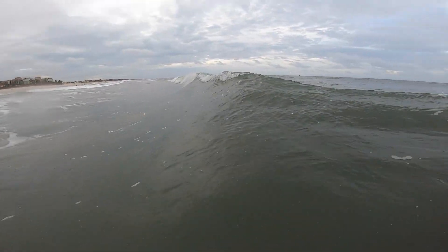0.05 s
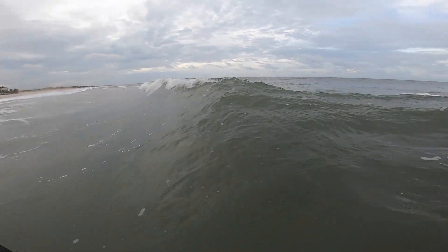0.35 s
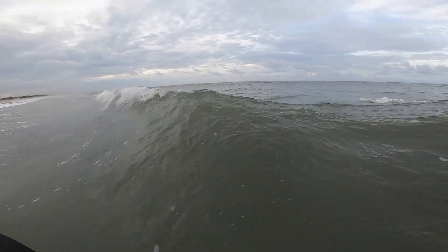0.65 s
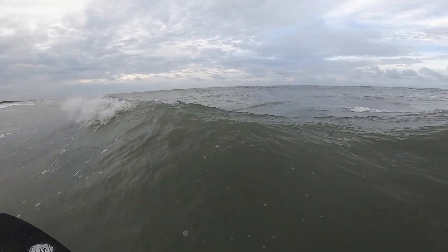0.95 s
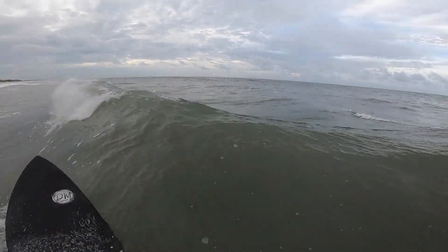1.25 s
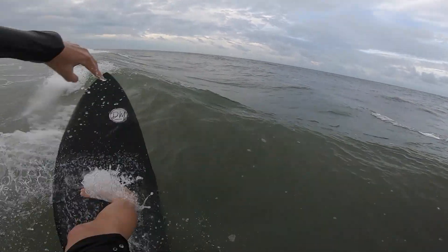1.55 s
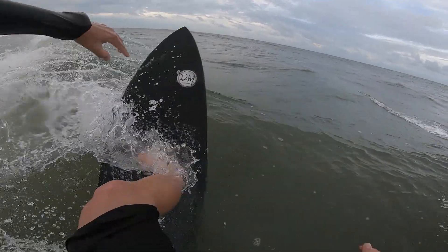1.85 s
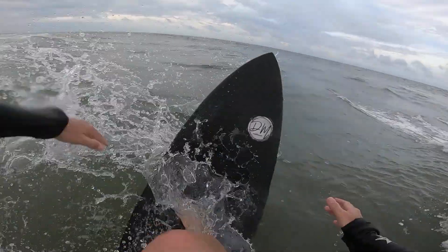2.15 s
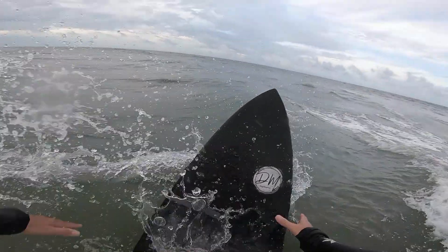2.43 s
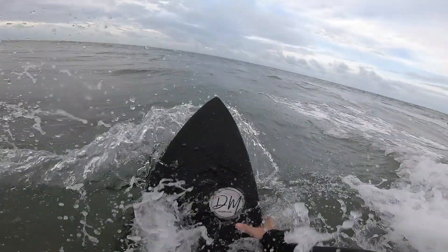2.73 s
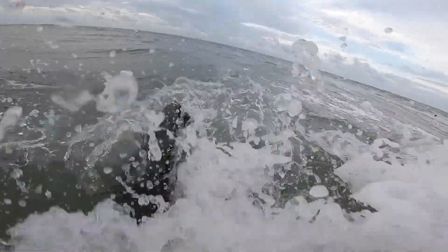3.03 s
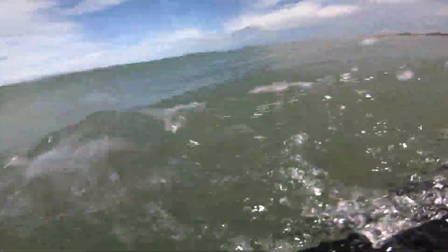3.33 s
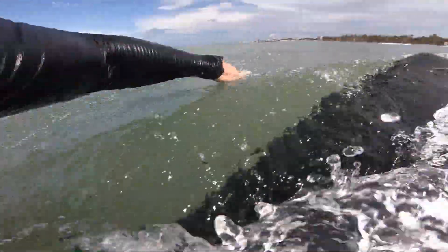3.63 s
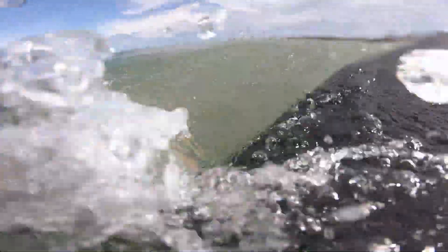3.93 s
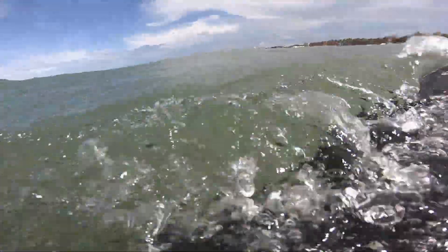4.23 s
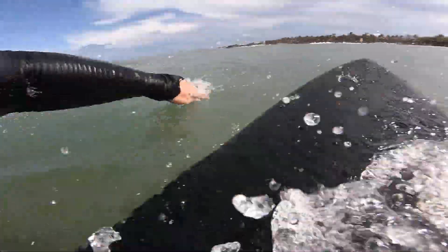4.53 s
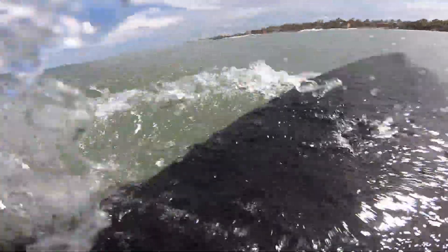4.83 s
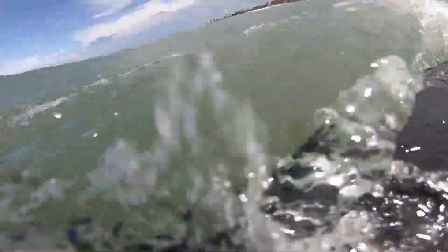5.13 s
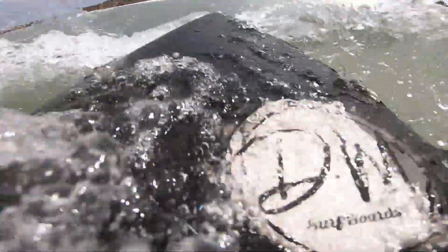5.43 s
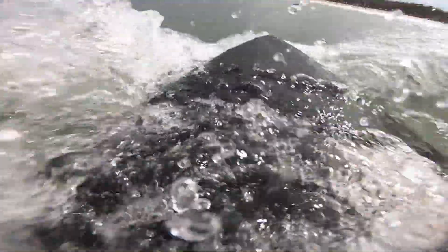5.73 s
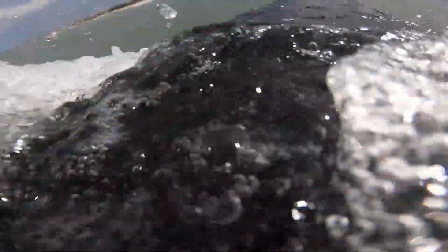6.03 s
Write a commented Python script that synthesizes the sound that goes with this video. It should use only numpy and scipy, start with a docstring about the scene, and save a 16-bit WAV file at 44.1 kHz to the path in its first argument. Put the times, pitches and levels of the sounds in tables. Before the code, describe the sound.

Surf buffets a microphone on a surfboard ride, first muffled in slow motion, then, after a short gap, with quick slaps, foam and drips.

```python
"""A surfer carries a camera through breaking waves. First, in slow motion and over an octave down,
whitewater rushes and bubbles, water surges against the board, and wind and spray buffet the wet
microphone port, a damped resonator that answers each slap with a short ring and a low thump.
Near 3.1 s comes a fifth of a second of silence. The ride then goes on at full speed, with brighter
foam and quicker slaps, while splashes and single drops strike the housing."""
import sys
import numpy as np
from scipy import signal
from scipy.fft import rfft, irfft, next_fast_len
from scipy.io import wavfile
from scipy.ndimage import uniform_filter1d, minimum_filter1d, map_coordinates

SR = 44100
rng = np.random.default_rng(int(sys.argv[2]) if len(sys.argv) > 2 else 0)


def int16_out(signal):
    """Quantize to a 16-bit WAV file."""
    q = np.round(np.clip(np.atleast_2d(signal).T, -1, 1) * 32767)
    wavfile.write(sys.argv[1], SR, q.astype(np.int16))


N = 268128

SLOW_MOTION = 0.43  # fraction of full speed
SILENCE_START_S, SILENCE_END_S = 3.087, 3.283

# Hard slaps on the port. Each row: time in seconds, relative ring and thump levels in dB.
SLAPS = [(0.458, -28, -48), (0.577, -26.5, -39), (1.028, -26.5, -34), (1.857, -15, -13), (1.877, -12, -13),
         (1.938, -9, -19.5), (2.101, -11, -13.5), (2.115, -7.5, -8.5), (2.168, -6.5, -12.5),
         (2.349, -10.5, -14.5), (2.425, -6, -9), (2.443, -9.5, -12), (2.461, -10, -7), (2.492, -9, -28),
         (2.567, -9, -12), (2.638, -11, -10.5), (2.717, -8.5, -10), (2.767, -5.5, -11),
         (2.871, -10.5, -4.5), (2.98, -24, -2.5), (3.031, -7.5, -23), (3.052, -13.5, -13.5),
         (3.074, -10, -14.5), (3.305, -22.5, -22.5), (3.329, -16.5, -13), (3.345, -11.5, -10.5),
         (3.356, -17.5, -18), (3.378, -9, -7.5), (3.385, -17, -26), (3.391, -12, -15), (3.405, -10, -13),
         (3.431, -11.5, -8), (3.454, -18.5, -24), (3.588, -10.5, -11.5), (3.905, -10.5, -12),
         (3.915, -13, -10.5), (3.928, -8, -10.5), (4.086, -10.5, -22), (4.094, -15, -34),
         (4.31, -11.5, -27), (4.317, -9, -9), (4.359, -11.5, -13), (4.365, -8, -17.5), (4.538, -9.5, -16.5),
         (4.56, -16.5, -22), (5.025, -9, -12), (5.035, -5.5, -20), (5.172, -21, -17.5), (5.204, -12, -30),
         (5.26, -9, -15), (5.267, -8, -24), (5.297, -7.5, -25), (5.368, -12, -20), (5.41, -9, -11),
         (5.479, -11, -8.5), (5.495, -10, -11), (5.505, -5, -5.5), (5.679, -7.5, -18), (5.803, -7, -16),
         (5.82, -6, -7.5), (5.847, -10.5, -14.5), (5.875, -14.5, -13), (5.935, -11.5, -12),
         (5.966, -13.5, -29), (5.985, -11, -32), (6.023, -10.5, -10)]
# Gushes of water and air over the port. Each row: start and length in seconds, ring and thump in dB.
GUSHES = [(0.0, 0.2, -42, -57), (0.7, 0.26, -42, -41.5), (1.3, .12, -45, -39), (1.8, 0.055, -32, -29.5),
          (1.87, 0.098, -26.5, -21.5), (2.0, .17, -22.5, -30), (2.23, 0.19, -28.5, -35),
          (2.44, 0.054, -28.5, -23.5), (2.66, 0.16, -25, -20.5), (2.86, 0.18, -26, -15),
          (3.33, 0.065, -29.5, -24), (3.91, 0.014, -33, -29), (5.05, 0.055, -29.5, -26),
          (5.268, 0.029, -18.5, -21), (5.33, 0.099, -24.5, -22), (5.495, 0.079, -26, -23.5),
          (5.58, 0.029, -17, -17), (5.65, 0.051, -19.5, -13), (5.74, 0.11, -28.5, -15.5),
          (5.895, 0.039, -22.5, -18), (5.99, 0.075, -29, -20)]
# Spectrum of a wet splat at full speed. Each row: frequency in Hz, relative density in dB.
SPLAT_SPECTRUM = [(150, 7), (330, -2), (520, -11.5), (820, -8), (1000, -2), (1550, 6.5), (2100, -7),
                  (2700, -22.5), (3400, -27.5), (4800, -40), (6500, -52), (11000, -79), (16000, -115)]
# Sheets of whitewater thrown up by the board. Each row: start and length in seconds, level in dB.
WASHES = [(0.36, 1.6, -51), (0.44, 0.021, -60), (2.3, 0.085, -50.5), (3.55, 0.24, -37.5),
          (3.82, 0.27, -51.5), (4.11, 0.21, -33.5), (4.42, 0.22, -56), (4.72, 0.061, -33),
          (4.87, 0.092, -40.5), (5.05, .06, -32.5), (5.22, 0.23, -34.5), (5.52, 0.32, -34.5),
          (6.0, 0.072, -36)]
# Whitewater spectra, slow and fast. Each row: frequency in Hz, relative density in dB.
SLOW_WATER_SPECTRUM = [(120, -16), (260, -4), (420, -15.5), (680, -2), (1080, -6.5), (1400, -12.5),
                       (2050, -17), (2500, -22.5), (3300, -26.5), (4500, -37), (5300, -42), (6500, -57),
                       (9000, -92.5)]
FAST_WATER_SPECTRUM = [(300, -9.5), (550, -11), (700, -5.5), (1050, -4), (1600, 7.5), (2200, -6),
                       (2700, -5), (4000, -16.5), (5200, -23.5), (6100, -30), (9000, -35.5), (11000, -44.5),
                       (12500, -60), (15000, -72)]
# Cavity resonances of the housing at full speed. Each row: centre and half width in Hz, gain in dB.
CAVITY_MODES = [(3900, 200, -0.5), (4840, 200, 3), (7360, 200, 4.5), (10640, 710, 3.5)]
# Sheets of spray. Each row: peak time and Gaussian width in seconds, relative level in dB.
SPLASHES = [(4.01, 0.017, -55), (4.093, 0.012, -34), (4.56, 0.016, -37.5), (5.223, 0.013, -43),
            (5.307, 0.0042, -38.5), (5.536, 0.013, -38.5), (5.694, 0.0074, -47.5), (5.785, .013, -37.5),
            (5.97, 0.002, -44), (6.035, 0.036, -44)]
# Big drops on the housing. Each row: time in seconds, peak level of the ping in dB, pitch in Hz.
DROPS = [(0.4224, -48, 4110), (0.7277, -43.5, 4530), (3.85, -34.5, 4960), (4.0941, -24.5, 4830),
         (4.5696, -16.5, 5080), (4.8289, -33, 4700), (5.2054, -29.5, 4930), (5.223, -28.5, 3880),
         (5.233, -21.5, 3580), (5.2998, -20.5, 3670), (5.3151, -13, 2600), (5.4084, -26, 4770),
         (5.5295, -17, 3600), (5.5326, -19, 4430), (5.5865, -21, 4350), (5.6413, -28, 5230),
         (5.6822, -22.5, 3820), (5.7688, -20.5, 3400), (5.795, -22, 2560), (5.9688, -26.5, 3550),
         (6.0106, -25.5, 3370), (6.0744, -15.5, 3630)]
# Response of the struck housing. Each row: frequency in Hz, gain in dB.
HOUSING_RESPONSE = [(700, -29), (1500, 24.5), (2600, 11), (3400, 2), (4800, 2.5), (6500, -1), (8500, -2.5),
                    (10800, -11), (13500, -17), (16000, -29.5)]
# Surges against the board. Each row: peak time and Gaussian width in seconds, level in dB.
SURGES = [(1.925, 0.038, -19), (2.07, 0.053, -22.5)]
# Spectrum of a surge. Each row: frequency in Hz, relative density in dB.
SURGE_SPECTRUM = [(50, -23.5), (120, -6), (170, 1), (250, 7.5), (330, -5), (450, -1), (650, -3),
                  (850, -20.5), (1300, -23.5), (3000, -80)]
# Strength of the wind on the microphone. Each row: time in seconds, relative level in dB.
WIND_LEVELS = [(0, -29), (0.4, -33.5), (0.85, -31.5), (1.7, -34), (1.85, -19.5), (2.05, -26.5), (2.18, -18),
               (2.35, -29), (3.3, -27.5), (3.8, -33.5), (4.952, -27.5), (5.1, -22.5), (5.35, -19.5),
               (5.6, -27), (6.08, -15.5)]
# Wind spectra, slow and fast. Each row: frequency in Hz, relative density in dB.
SLOW_WIND_SPECTRUM = [(10, -7.5), (25, 5.5), (50, -3.5), (90, -6.5), (200, -18), (400, -23.5), (900, -103)]
FAST_WIND_SPECTRUM = [(10, -3.5), (25, 4.5), (55, -2), (100, -9), (200, -21), (500, -38), (1200, -69)]


def port(times, ring, thump, speed, ring_hz, thump_hz, ring_rise_s=0.00086, scatter=0.058):
    """Impulse response: the port's membrane rings, then thumps. Slow motion stretches and lowers both."""
    detune = np.exp(scatter * rng.standard_normal((len(times), 2)))
    high = rings(times, -ring, ring_hz * speed * detune[:, 0], ring_rise_s / speed)
    lag_s = 0.0013 / speed
    low = rings(times + lag_s, -thump, thump_hz * speed * detune[:, 1], rise_s=0.0025 / speed)
    return high, low


def slaps(speed, ring_db, thump_db, ring_hz, thump_hz, splat_db, splat_rise_s=0.0017):
    """Impact excitation: each hard slap of wind and spray drives the port and adds a noisy wet splat."""
    times, ring, thump = slaps_at(speed).T
    age = np.arange(SR // 10) / SR * speed / splat_rise_s
    hits = impulses(times, amp(ring + splat_db))
    envelope = signal.fftconvolve(hits, age * np.exp(1 - age))[:N]
    splat = envelope * splat_noise(speed)
    high, low = port(times, amp(ring + ring_db), amp(thump + thump_db), speed, ring_hz, thump_hz)
    return splat + high + low


def flutter(speed, count, ring_hz, thump_hz, uneven_db, churn_db):
    """Turbulent forcing: small slaps in churning water shake the port. Ring and thump are at rms 1."""
    times = (np.arange(count) + 2 * rng.random(count)) * N / SR / count
    sizes = amp(uneven_db * rng.standard_normal(count))
    thumps = sizes * rng.choice([-1, 1], count)
    high, low = port(times, sizes, thumps, speed, ring_hz, thump_hz, ring_rise_s=0.0014, scatter=0.11)
    churn = amp(churn_db) * splat_noise(speed)
    return unit(unit(high) + churn), unit(low)


def splat_noise(speed):
    """Time scaling: the noise of water on the port, at rms 1, falls in frequency with the speed."""
    return unit(noise(np.multiply(SPLAT_SPECTRUM, [speed, 1])))


def whitewater(spectrum, speed, count, bubble_db, uneven_db, patchy_db, bubble_hz=2800):
    """Cavity resonance: the hollow housing colours the hiss and bursting bubbles of foam, at rms 1."""
    hz = speed * bubble_hz * np.exp(0.554 * np.clip(rng.standard_normal(count), -2, 2))
    sizes = amp(uneven_db * np.minimum(rng.exponential(1, count), 3.5))
    bubbles = unit(rings(rng.random(count) * N / SR, sizes, hz, rise_s=2 / hz))
    hiss = rng.standard_normal(N) * amp(patchy_db * wobble(70 * speed))
    foam = coloured(hiss + amp(bubble_db) * bubbles, spectrum)

    def cavity(f):
        peaks_db = (db / (1 + ((f / speed - centre) / width) ** 2) for centre, width, db in CAVITY_MODES)
        return amp(sum(peaks_db))
    return unit(filtered(foam, cavity))


def spray(count=6000, splash_db=4, uneven_db=4, tick_db=-15, tick_decay_s=0.0015):
    """Impact noise: sheets of tiny droplets crackle on the housing; big drops tick on it and ping."""
    pitches_hz = rng.uniform(1200, 15000, count)
    sizes = amp(uneven_db * np.minimum(rng.exponential(1, count), 4))
    crackle = unit(rings(rng.random(count) * N / SR, sizes, pitches_hz, rise_s=0.00035))
    sheets = amp(splash_db) * swells(SPLASHES) * crackle
    times, db, hz = np.transpose(DROPS)
    hits = impulses(times, amp(db + tick_db) * (times > SILENCE_END_S))  # slowed drops only ping
    tick_envelope = signal.lfilter([1], [1, -np.exp(-1 / (tick_decay_s * SR))], hits)
    ticks = tick_envelope * rng.standard_normal(N)
    pings = rings(times, amp(db), hz, rise_s=3 / hz)
    return coloured(sheets + ticks, HOUSING_RESPONSE) + pings


def droplets(foam_gain, count=40, uneven_db=6.5, centre_hz=4300):
    """Free vibration: stray droplets ping on the housing at random, harder when more foam flies."""
    times = rng.random(count) * (N - 1) / SR
    hz = centre_hz * np.exp(0.16 * rng.standard_normal(count))
    sizes = amp(uneven_db * np.clip(rng.standard_normal(count), -2, 2))
    return rings(times, foam_gain[(times * SR).astype(int)] * sizes, hz, rise_s=3 / hz)


def surge():
    """Flow noise: water pushes against the board in low swells."""
    return swells(SURGES) * unit(noise(SURGE_SPECTRUM))


def wind(spectrum, speed, lumpy_db, eddy_db=-15, eddy_rise_s=0.011):
    """Turbulent pressure rumbles on the microphone; the wind and an eddy behind each slap add in power."""
    times, ring, _ = slaps_at(speed).T
    age = np.arange(SR // 2) / SR * speed / eddy_rise_s
    kicks = impulses(times, amp(ring + eddy_db) ** 2)
    eddy_power = speed * np.abs(signal.fftconvolve(kicks, (age * np.exp(1 - age)) ** 2)[:N])
    wind_power = amp(np.interp(np.arange(N) / SR, *np.transpose(WIND_LEVELS))) ** 2
    rumble = unit(noise(spectrum) * amp(lumpy_db * wobble(14)))
    return np.sqrt(wind_power + eddy_power) * rumble


def rings(times, sizes, hz, rise_s):
    """Superposition of damped tones: each swells to its size in rise_s, then dies away."""
    times, sizes, hz, rise_s = (v[:, None] for v in np.broadcast_arrays(times, sizes, hz, rise_s))
    k = np.arange(int(8 * rise_s.max() * SR))
    age = k / SR / rise_s
    waves = sizes * (age * np.exp(1 - age)) ** 2 * np.sin(2 * np.pi * hz * k / SR)
    samples = np.abs(times * SR).astype(int) + k
    return np.bincount(samples.ravel(), waves.ravel(), N)[:N]


def impulses(times, sizes):
    """An impulse train with the given times in seconds."""
    return np.bincount((times * SR).astype(int), sizes, N)[:N]


def bursts(rows, attack_s, release_s):
    """One envelope per dB column: each row rises up to its start, holds and decays exponentially."""
    t = np.arange(N) / SR
    total = 0
    for start, length, *db in rows:
        speed = speed_at(start)
        rise = np.clip(1 + (t - start) * speed / attack_s, 0, 1) ** 2
        fall = np.exp(-np.maximum(t - start - length, 0) * speed / release_s)
        total = total + amp(db)[:, None] * rise * fall
    return total


def swells(rows):
    """An envelope with one Gaussian pulse per row."""
    t = np.arange(N) / SR
    return sum(amp(db) * np.exp(-((t - peak) / width) ** 2 / 2) for peak, width, db in rows)


def speed_at(time_s):
    """The time scale: slow motion before the silence, full speed after it."""
    return SLOW_MOTION if time_s < SILENCE_START_S else 1


def slaps_at(speed):
    """The slaps that share one time scale."""
    return np.array([row for row in SLAPS if speed_at(row[0]) == speed])


def wobble(rate):
    """Random modulation: a spline through rate knots a second."""
    knots = rng.standard_normal(int(N * rate / SR) + 4)
    return map_coordinates(knots, [np.arange(N) * rate / SR])


def noise(spectrum):
    """Gaussian noise shaped by a spectrum."""
    return coloured(rng.standard_normal(N), spectrum)


def coloured(x, spectrum):
    """Spectral shaping by (Hz, dB) points on a log axis, with nothing above the last point."""
    hz, db = np.transpose(spectrum)
    return filtered(x, lambda f: amp(np.interp(np.log(f + 1), np.log(hz), db)) * (f < hz[-1]))


def filtered(x, response):
    """Linear filtering: the spectrum of x times a frequency response."""
    size = next_fast_len(N + SR // 2)
    return irfft(rfft(x, size) * response(np.fft.rfftfreq(size, 1 / SR)), size)[:N]


def amp(db):
    """Decibels to amplitude ratio."""
    return 10 ** (np.asarray(db) / 20)


def unit(x):
    """Normalisation to rms 1."""
    return x / np.sqrt(np.mean(x ** 2) + 1e-20)


def slow_ride(wash, ring, thump, foam_db=-44):
    """Time dilation: the take-off and first turn, with the port's pitches scaled down by SLOW_MOTION."""
    speed = SLOW_MOTION
    high, low = flutter(speed, count=1500, ring_hz=1286, thump_hz=264, uneven_db=1.5, churn_db=-5.5)
    buffets = ring * high + thump * low
    rumble = amp(0.5) * wind(SLOW_WIND_SPECTRUM, speed, lumpy_db=2.5)
    foam = whitewater(SLOW_WATER_SPECTRUM, speed, count=1500, bubble_db=-15, uneven_db=4, patchy_db=1)
    water = (amp(foam_db) + wash) * foam + surge()
    hits = slaps(speed, ring_db=-1.5, thump_db=3.5, ring_hz=1310, thump_hz=233, splat_db=-23.5)
    return hits + buffets + water + rumble


def fast_ride(wash, ring, thump, foam_db=-48.5):
    """Superposition at full speed: slaps, foam and wind as the board ploughs through the wave."""
    speed = 1
    high, low = flutter(speed, count=2600, ring_hz=1292, thump_hz=186, uneven_db=2.5, churn_db=-1.5)
    buffets = ring * high + np.hypot(thump, amp(2.5) * wash) * low  # a wash shakes the port too
    rumble = amp(3.5) * wind(FAST_WIND_SPECTRUM, speed, lumpy_db=4)
    foam = whitewater(FAST_WATER_SPECTRUM, speed, count=2400,
                      bubble_db=-14.5, uneven_db=0.5, patchy_db=3.5)
    foam_gain = amp(foam_db) + wash
    water = foam_gain * foam + amp(-10.5) * droplets(foam_gain)
    hits = slaps(speed, ring_db=-1, thump_db=4, ring_hz=1290, thump_hz=167, splat_db=-8)
    return hits + buffets + water + rumble


def scene():
    """Amplitude modulation: washes and gushes drive both rides, and a silence parts slow from fast."""
    t = np.arange(N) / SR
    wash, = bursts(WASHES, attack_s=0.12, release_s=0.029)
    ring, thump = bursts(GUSHES, attack_s=0.029, release_s=0.011)
    slow_gate = np.clip(np.minimum(t, SILENCE_START_S - t) / 0.002, 0, 1)
    fast_gate = np.clip((t - SILENCE_END_S) / 0.021, 0, 1) ** 2
    slow = slow_gate * slow_ride(wash, ring, thump)
    fast = fast_gate * fast_ride(wash, ring, thump)
    return (slow + fast + spray())[None]


def record(dry, ceiling=0.85, top_hz=15750):
    """Peak limiting and band limiting: the camera ducks the hardest slaps and cuts off at top_hz."""
    needed = np.minimum(1, ceiling / (np.abs(dry[0]) + 1e-9))
    held = minimum_filter1d(needed, size=400)
    gain = uniform_filter1d(uniform_filter1d(held, size=200), size=200)
    return filtered(dry[0] * gain, lambda hz: hz < top_hz)[None]


dry = scene()
out = record(dry)
int16_out(out)
```